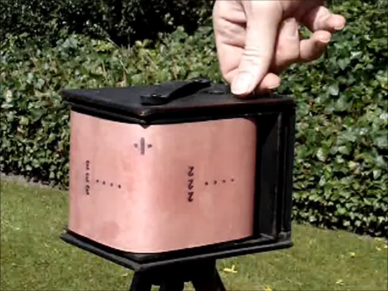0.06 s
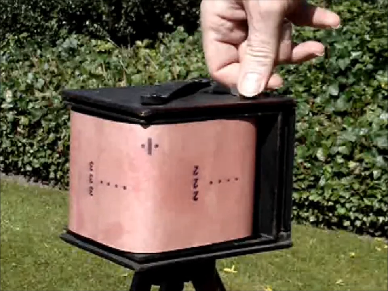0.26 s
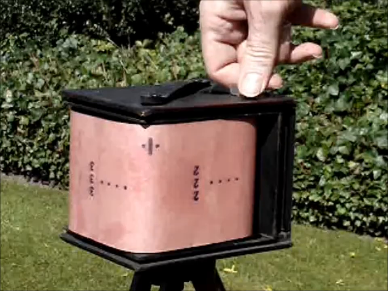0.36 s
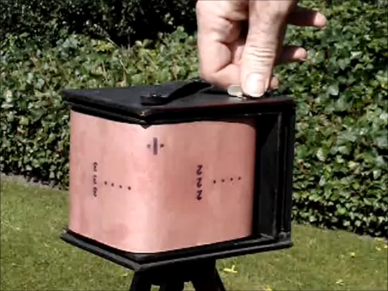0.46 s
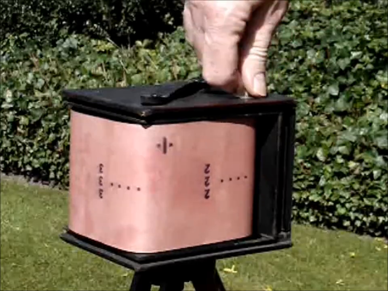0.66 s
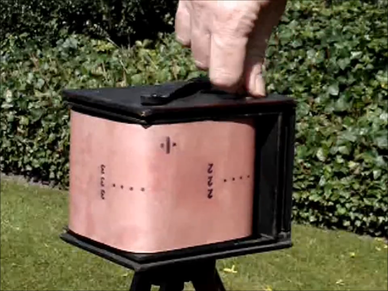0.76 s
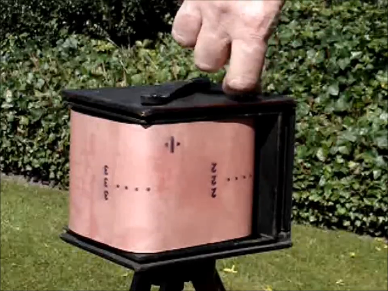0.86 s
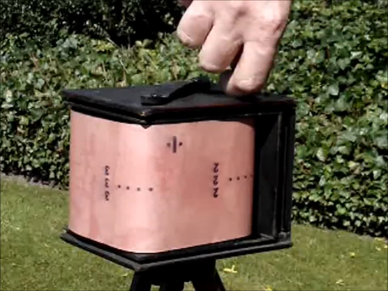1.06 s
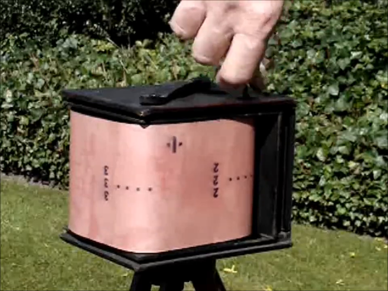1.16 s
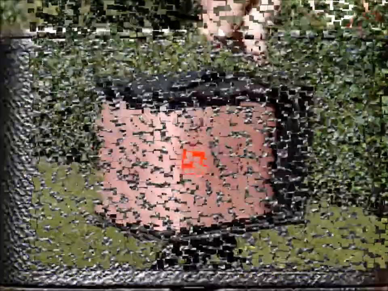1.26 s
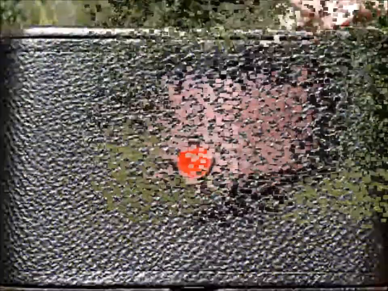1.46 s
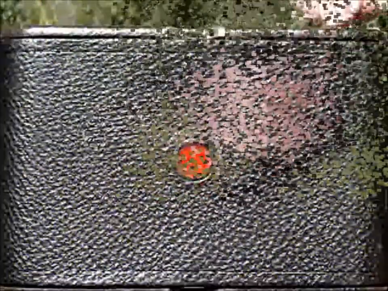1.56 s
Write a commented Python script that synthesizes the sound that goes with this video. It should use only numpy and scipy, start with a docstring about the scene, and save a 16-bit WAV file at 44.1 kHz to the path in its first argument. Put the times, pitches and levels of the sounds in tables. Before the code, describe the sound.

Ratchet clicks from the winding key of an old box camera start at about 0.2 seconds, close and dry, and speed up until 1.1 seconds, each ringing the hollow body, some with a tiny spring ping. A soft double knock follows at 1.25 seconds. Over faint outdoor air, small birds chirp at the start, around 1 second and at 1.3, when one whistles a short rising note.

```python
"""In a garden, a hand winds the key of an old box camera. The pawl snaps over the ratchet teeth,
gathering speed, each snap ringing the hollow box and some pinging the spring; the key is let go with a
soft double knock. Small birds chirp from the hedges and one whistles, over a faint bed of outdoor air."""
import sys
import numpy as np
from scipy import signal
from scipy.fft import rfft, irfft
from scipy.io import wavfile
from scipy.ndimage import uniform_filter1d

SR = 44100
rng = np.random.default_rng(int(sys.argv[2]) if len(sys.argv) > 2 else 0)


def wrap_up_sound(samples):
    """Save the sound to the file named by the first command line argument, as 16-bit audio."""
    columns = np.atleast_2d(samples).T
    # keep every value between -1 and 1, then stretch to whole-number steps
    tamed = np.clip(columns, -1, 1)
    steps = np.round(tamed * 32767).astype(np.int16)
    wavfile.write(sys.argv[1], SR, steps)


N = 70560
T = np.arange(N) / SR

# the pawl drops off a tooth:
# (time [s], level [dB], treble tilt [dB/octave], box ring [dB], spring ring [dB])
CLICKS = [(0.2191, -0.5, -0.1, 1, -53), (0.2888, 4, -1.5, -4.5, -52), (0.3439, -2, 0, 2.5, -25.5),
          (0.3984, -0.5, -0.3, 3.5, -59), (.4494, 1.5, 0.4, 0, -58), (.504, -1, .5, 1.5, -65),
          (0.5786, -4, 3, 7.5, -27), (0.6213, 0, 1.5, 0, -55), (.6712, -0.5, 0.5, 3, -50),
          (0.718, 3.5, -2.5, -3, -59), (.7555, 1.5, 0, 1.5, -37), (.7975, 1.5, -2, 0.5, -25.5),
          (0.8407, -1, -.5, 3.5, -27.5), (0.8746, 1.5, -0.5, -0.5, -30), (0.9123, 0, 0, -0.5, -26),
          (.949, 1.5, 0, -3.5, -65), (0.9847, 5.5, -1, -5, -54), (1.0238, -2, -1, 5.5, -63),
          (1.0851, 2, -2, 1.5, -37)]


def from_db(db):
    """Decibels to gain."""
    return 10 ** (np.asarray(db) / 20)


def rms_one(x):
    """Scale to rms 1."""
    return x / np.sqrt(np.mean(x ** 2) + 1e-20)


def butter(order, hz, kind="low"):
    """A Butterworth filter."""
    return signal.butter(order, hz, kind, fs=SR, output="sos")


def at_hz(points, hz, column=1):
    """Read a column of a table on a log-frequency axis."""
    table = np.array(points)
    return np.interp(np.log(hz), np.log(table[:, 0]), table[:, column])


def noise(spectrum):
    """Steady noise of a given colour, rms 1."""
    hz = np.maximum(np.arange(N // 2 + 1) * SR / N, 1)
    return rms_one(irfft(rfft(rng.standard_normal(N)) * from_db(at_hz(spectrum, hz)), N))


def ring(age, hz, t60):
    """A dying sine that starts at age 0."""
    age = np.maximum(age, 0)
    return np.sin(2 * np.pi * hz * age) * from_db(-60 * age / t60)


def around(time):
    """The samples near a hit, and their age in seconds."""
    near = (T > time - .01) & (T < time + .09)
    return near, T[near] - time


def treble_tilt(tilt_db, hz, flat_below_hz=1300, pivot_hz=2500):
    """Gain that brightens or dulls a hit; the low modes keep their balance."""
    return from_db(tilt_db * np.log2(max(hz, flat_below_hz) / pivot_hz))


def garden_echo(x, t60=.36, predelay_s=.012):
    """Scattered reflections from hedges and walls."""
    tail = rng.standard_normal(N) * from_db(-60 * T / t60) * (T > predelay_s)
    return signal.fftconvolve(x, tail / np.linalg.norm(tail))[:N]


def air():
    """A bed of distant rumble and leaf hiss, a little louder towards the end."""
    # colour of the outdoor air: (frequency [Hz], spectral level [dB])
    colour = [(25, -9), (55, -10.5), (160, -4), (300, -4), (500, -5), (1000, -9), (2000, -12), (3500, -16),
              (6000, -21), (8200, -20.5), (10000, -26)]
    # swell of the rumble: (time [s], gain [dB])
    rumble_swell = [(0, -9.5), (.19, -1), (.4, -1), (1.2, -4.5), (1.3, 0.5), (1.6, -1)]
    # swell of the hiss: (time [s], gain [dB])
    hiss_swell = [(0, 1), (.2, 1), (.4, -1), (1.05, -1), (1.12, 1), (1.24, 1), (1.3, 4.5), (1.6, 4.5)]
    wash = from_db(-51) * noise(colour)
    rumble = signal.sosfiltfilt(butter(2, hz=400), wash)
    hiss = wash - rumble
    rumble_db = np.interp(T, *np.transpose(rumble_swell))
    hiss_db = np.interp(T, *np.transpose(hiss_swell))
    return rumble * from_db(rumble_db) + hiss * from_db(hiss_db)


def chirping_birds(waver_depth=.04):
    """Short wavering glides, smeared by the garden."""
    # chirps: (time [s], length [s], start pitch [Hz], end pitch [Hz], level [dB])
    chirps = [(0, 0.012, 3660, 3900, -41.5), (.006, 0.029, 4540, 4540, -45.5),
              (0.936, 0.011, 4150, 4340, -42), (0.959, 0.0291, 2796, 3570, -33.5),
              (.978, 0.023, 3980, 3850, -30.5), (1.0, 0.025, 4000, 3750, -31),
              (1.025, 0.036, 3433, 2980, -38), (1.04, 0.042, 3730, 3150, -53),
              (1.268, 0.02, 4150, 4520, -43.5), (1.292, 0.031, 4290, 4000, -38),
              (1.318, 0.03, 3520, 3200, -44), (1.346, 0.023, 3480, 3430, -35)]
    waver = rms_one(signal.sosfilt(butter(2, hz=260), rng.standard_normal(N)))
    song = np.zeros(N)
    for time, length, start_hz, end_hz, db in chirps:
        progress = np.clip((T - time) / length, 0, 1)
        hz = (start_hz + (end_hz - start_hz) * progress) * (1 + waver_depth * waver)
        envelope = from_db(db) * np.sin(np.pi * progress)
        song += envelope * np.sqrt(2) * np.sin(2 * np.pi * np.cumsum(hz) / SR)
    return song + from_db(-4) * garden_echo(song)


def spool_rub():
    """The spool rubs faintly for as long as the key turns."""
    # colour of the friction: (frequency [Hz], spectral level [dB])
    colour = [(200, -27), (500, 10), (1000, 17), (2000, 13.5), (4000, -30), (10000, -35.5)]
    turning = (T > CLICKS[0][0]) & (T < CLICKS[-1][0])
    return from_db(-53) * uniform_filter1d(1.0 * turning, size=900) * noise(colour)


def case_crack(hits, slip_s=.0014, hold_s=.0022, choke_s=.0115):
    """The attack: each hit shakes the case's many damped modes; the treble dies before the lows."""
    # dense modes of the case: (frequency [Hz], spectral level [dB], t60 [s])
    dense_modes = [(443, -9, 0.077), (860, -7.5, .028), (1203, -8, 0.058), (1600, 1, 0.014),
                   (2500, -4, 0.024), (4210, -2.5, 0.033), (5870, -8, 0.024), (6600, -5, .018),
                   (7040, -5, 0.028), (9830, -12, 0.03)]
    out = np.zeros(N)
    edges_hz = np.geomspace(480, 10800, 23)
    for low, high in zip(edges_hz, edges_hz[1:]):
        hz = np.sqrt(low * high)
        band = signal.sosfilt(butter(3, [low, high], "band"), rng.standard_normal(N))
        band_gain = from_db(at_hz(dense_modes, hz) - 22) * np.sqrt((high - low) / 5000)
        t60 = at_hz(dense_modes, hz, column=2)
        for time, db, tilt_db, _ in hits:
            near, age = around(time)
            slip = from_db(-6) * np.exp(np.minimum(age, 0) / slip_s)  # the slide just before landing
            decay = from_db(-60 * np.maximum(age - hold_s, 0) / t60)
            choke = 1 / (1 + (age / choke_s) ** 8)
            envelope = np.where(age < 0, slip, decay * choke)
            burst = band[near] * envelope
            burst *= np.linalg.norm(envelope) / np.linalg.norm(burst)
            out[near] += band_gain * from_db(db) * treble_tilt(tilt_db, hz) * burst
    return out


def box_ring(hits, rise_s=.0011, rebound_s=.0035, scatter_db=2, detune=.0089):
    """The hollow body: each hit and its rebound ring the main modes, a little differently every time."""
    # modes of the box and winder: (frequency [Hz], level [dB], t60 [s])
    modes = [(500.5, -35, 0.066), (789, -35.5, 0.031), (1006.6, -24, 0.031), (1421, -28, 0.021),
             (1733, -28, 0.029), (1985, -24, 0.025), (2286, -34.5, 0.038), (2855, -24.5, 0.014),
             (3330, -28.5, 0.02), (3933, -23, 0.017), (4384, -25.5, 0.016), (4850, -28, 0.016),
             (6480, -24.5, 0.012), (8075, -27, 0.017)]
    out = np.zeros(N)
    for time, db, tilt_db, hollow_db in hits:
        near, age = around(time)
        rebound_age = age - rebound_s * rng.uniform(.6, 1.4)
        attack = 1 - np.exp(-np.maximum(age, 0) / rise_s)
        for k, (hz, mode_db, t60) in enumerate(modes):
            gain = from_db(db + hollow_db + mode_db + scatter_db * rng.standard_normal())
            pitch = hz * (1 + detune * rng.standard_normal())
            tone = attack * ring(age, pitch, t60) + from_db(-9) * ring(rebound_age, pitch, t60)
            out[near] += (-1) ** k * gain * treble_tilt(tilt_db, hz) * tone
    return out


def spring_ping(modes_hz=(8210, 8350), detune=.004, t60=.05, free_s=.012, mute_s=.002):
    """The pawl spring pings on two close modes for a set time, then is muted as a tooth lifts it."""
    out = np.zeros(N)
    for time, *_, db in CLICKS:
        near, age = around(time)
        gate = np.exp(-np.maximum(age - free_s, 0) / mute_s)
        lower_hz, upper_hz = np.array(modes_hz) * (1 + detune * rng.standard_normal(2))
        ping = ring(age, lower_hz, t60) + from_db(-6) * ring(age, upper_hz, t60)
        out[near] += from_db(db) * gate * ping
    return out


def dull_bumps(rise_s=.0031):
    """One-sided low pushes, a few milliseconds long, add weight to some clicks."""
    # bumps: (time [s], level [dB])
    bumps = [(0.2235, -32.5), (.346, -33.5), (.5795, -34.5), (0.6233, -39.5), (0.757, -42), (1.026, -44)]
    out = np.zeros(N)
    for time, db in bumps:
        progress = np.maximum(T - time, 0) / rise_s
        out += from_db(db) * progress * np.exp(1 - progress)
    return signal.sosfilt(butter(1, hz=3.7, kind="high"), out)


def key_knocks():
    """The key is let go: a softer contact than the pawl's shakes the same box."""
    # knocks of the key: (time [s], level [dB], treble tilt [dB/octave], box ring [dB])
    knocks = [(1.2414, -8.5, -1, 2.5), (1.2518, -14, 5, 6)]
    return signal.sosfilt(butter(2, hz=4270), case_crack(knocks) + box_ring(knocks))


def whistling_bird():
    """One pure note slides up and holds, echoing in the garden."""
    # contour of the whistle: (time [s], pitch [Hz], level [dB])
    contour = [(1.291, 1742, -67), (1.305, 1811, -47.5), (1.328, 2015, -54), (1.354, 2140, -43),
               (1.383, 2142, -45.5), (1.472, 2108, -45), (1.494, 2160, -48), (1.524, 2165, -50.5),
               (1.56, 2234, -60)]
    times, hz, db = np.transpose(contour)
    envelope = np.interp(T, times, from_db(db), left=0, right=0)
    phase = 2 * np.pi * np.cumsum(np.interp(T, times, hz)) / SR
    note = envelope * np.sqrt(2) * np.sin(phase)
    return note + from_db(-6.5) * garden_echo(note)


def scene():
    """Mono mix: the camera close and dry, birds and air behind it."""
    hits = [click[:4] for click in CLICKS]
    ratchet = case_crack(hits) + box_ring(hits) + spring_ping()
    camera = ratchet + spool_rub() + dull_bumps() + key_knocks()
    return (camera + chirping_birds() + whistling_bird() + air())[None]


def record(dry, cutoff_hz=10050):
    """A steep low-pass takes off the top end."""
    taps = signal.firwin(401, cutoff_hz, window=("kaiser", 3), fs=SR)
    return signal.fftconvolve(dry, taps[None], mode="same")


dry = scene()
out = record(dry)
wrap_up_sound(out)
```